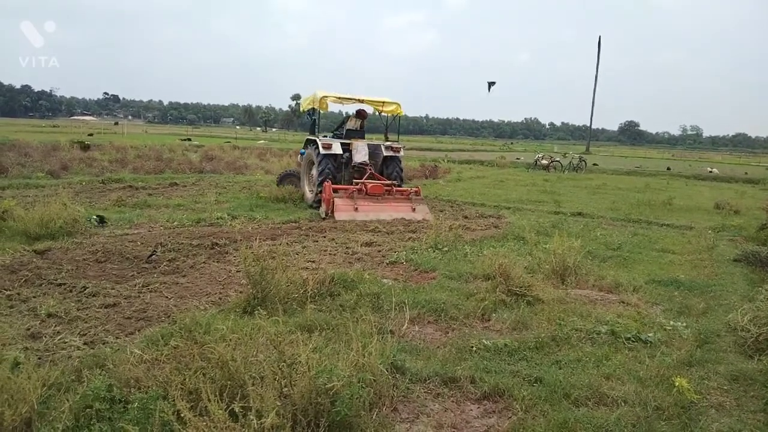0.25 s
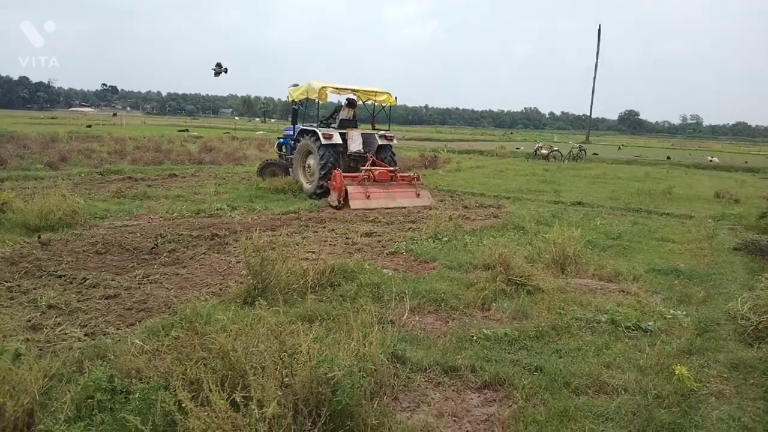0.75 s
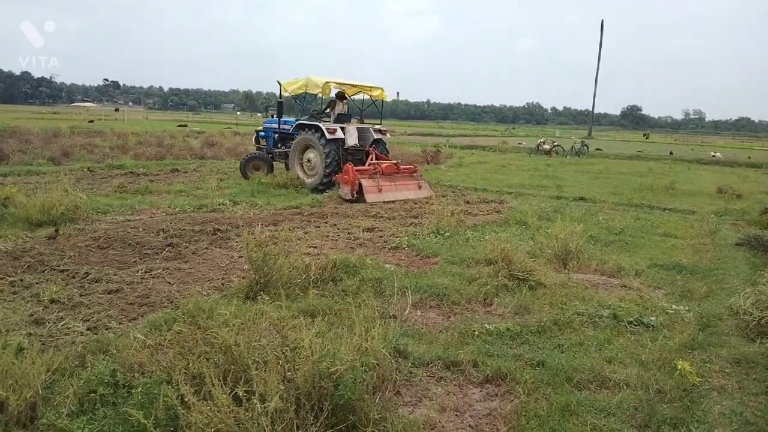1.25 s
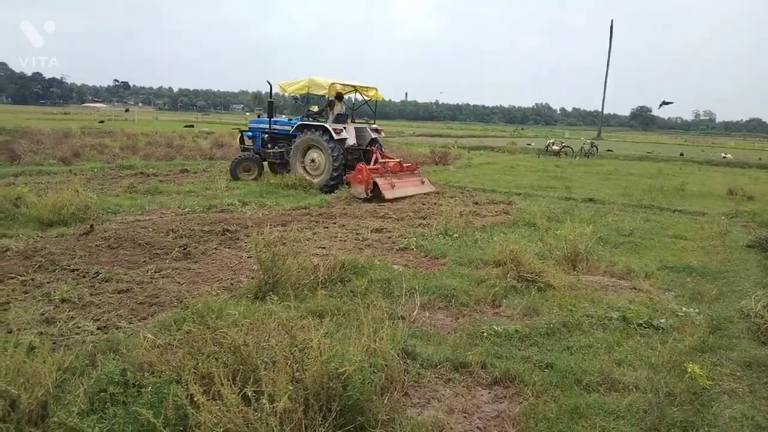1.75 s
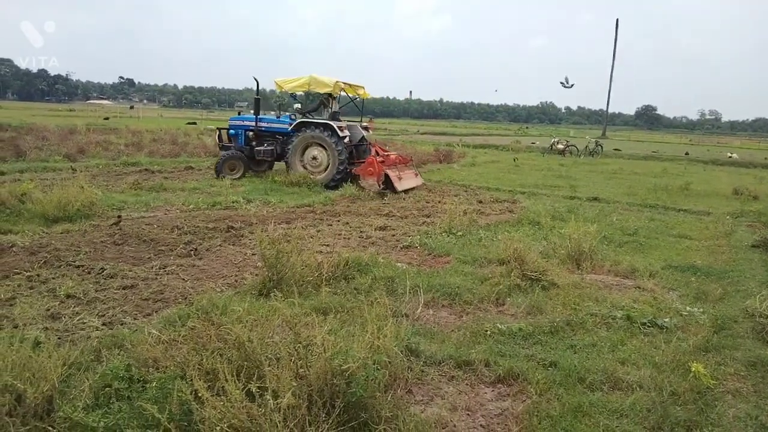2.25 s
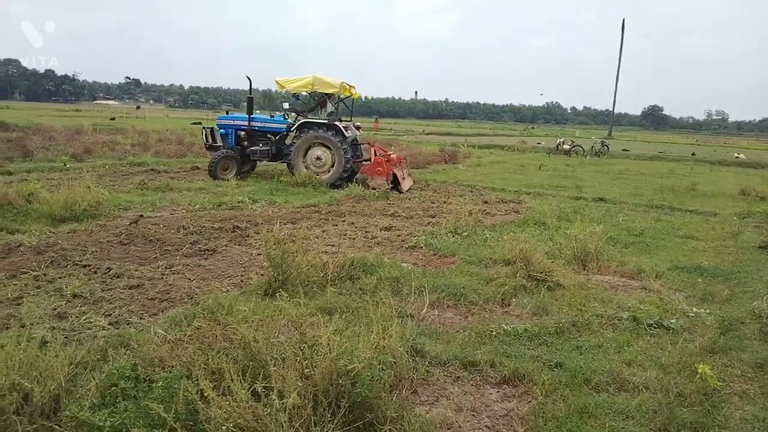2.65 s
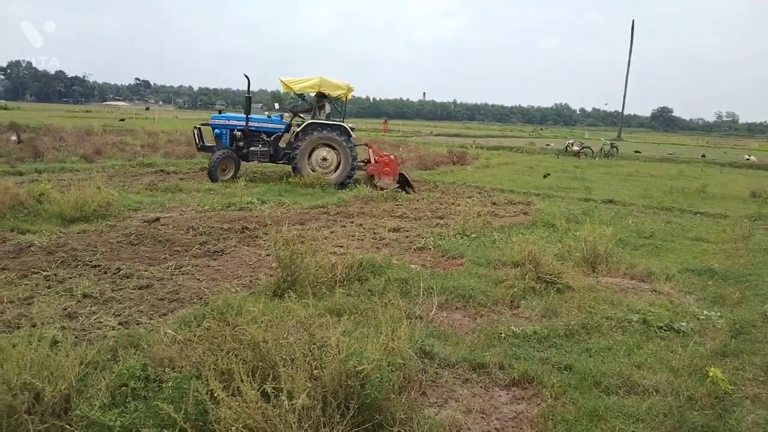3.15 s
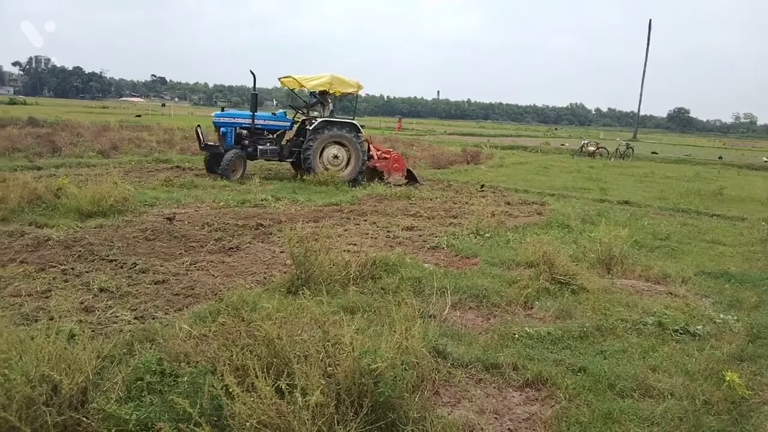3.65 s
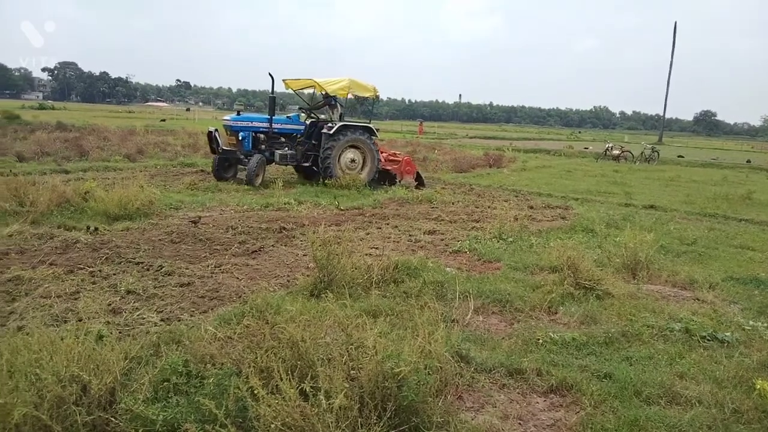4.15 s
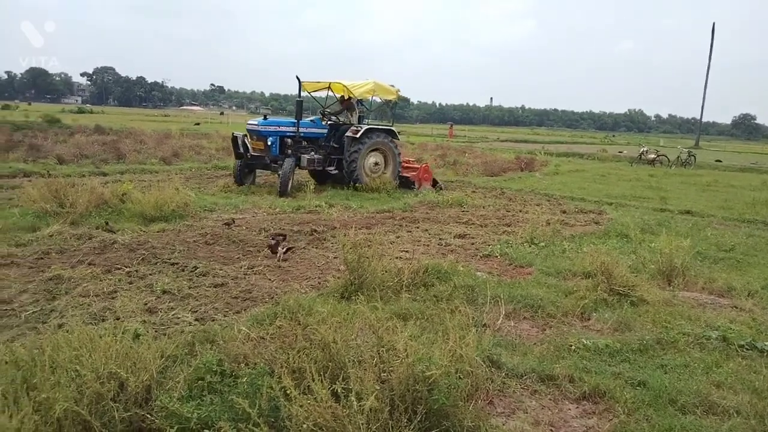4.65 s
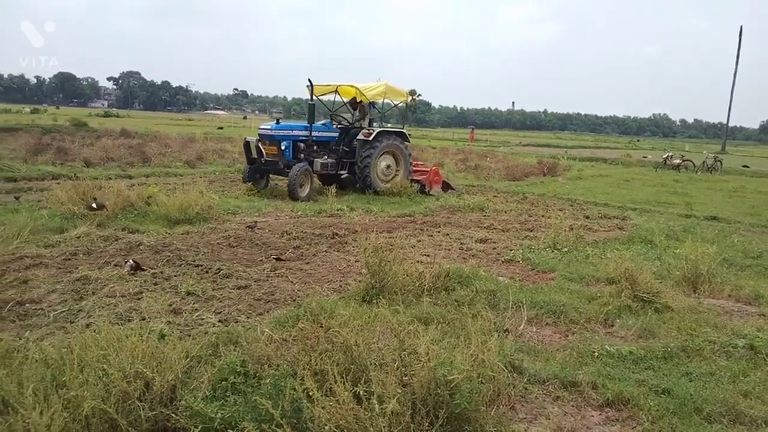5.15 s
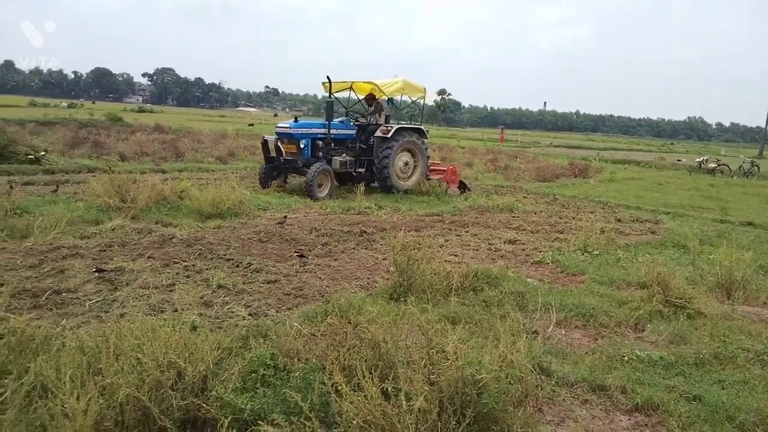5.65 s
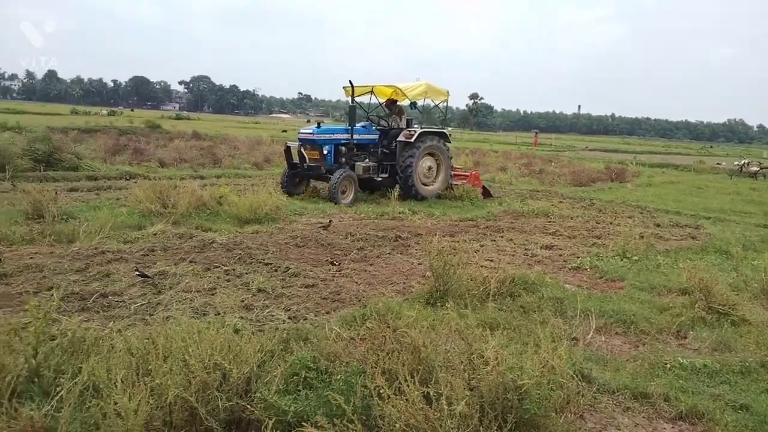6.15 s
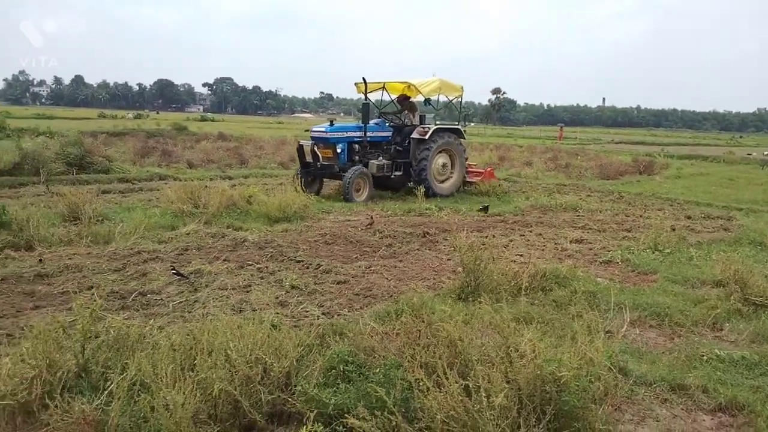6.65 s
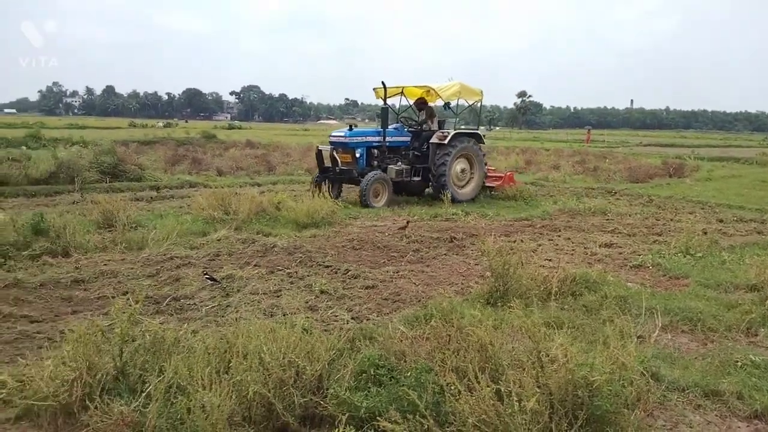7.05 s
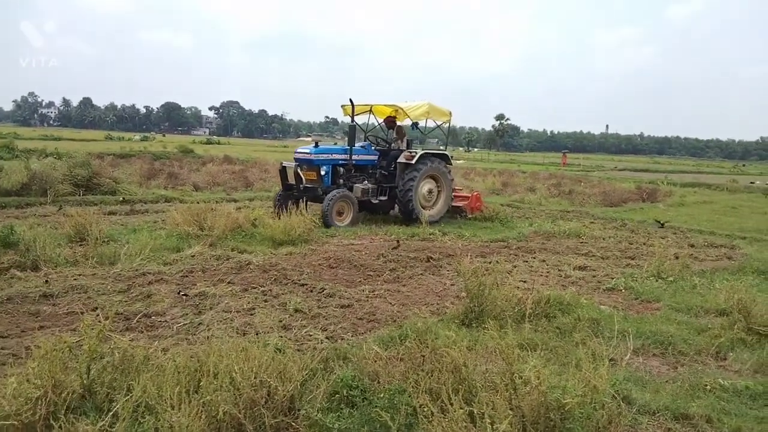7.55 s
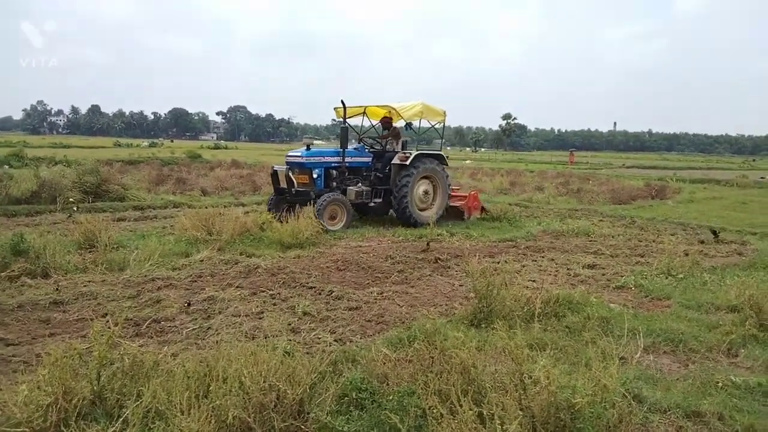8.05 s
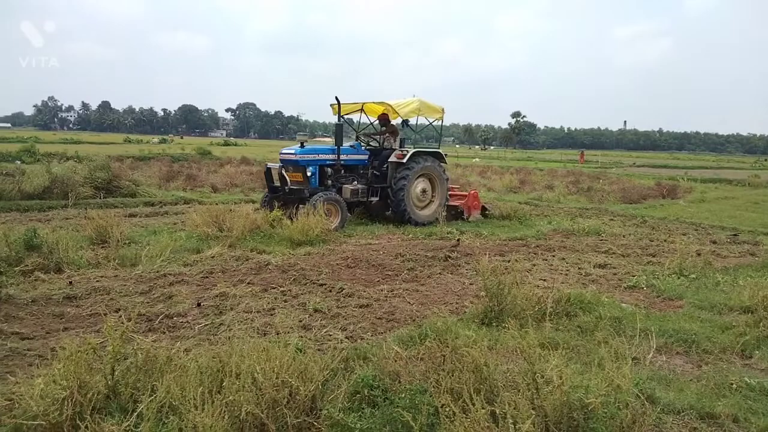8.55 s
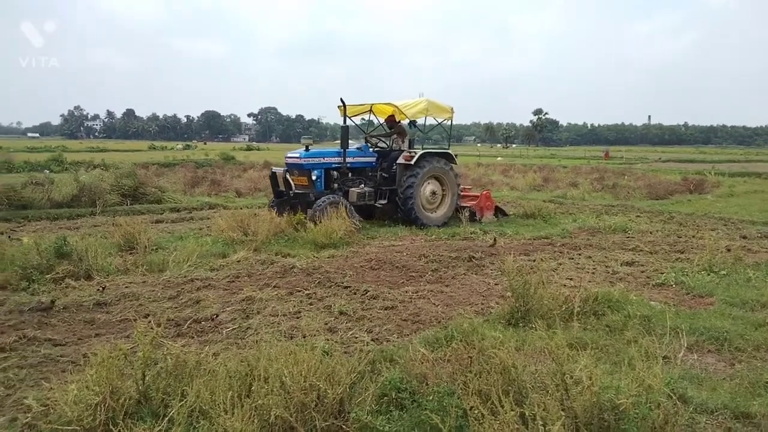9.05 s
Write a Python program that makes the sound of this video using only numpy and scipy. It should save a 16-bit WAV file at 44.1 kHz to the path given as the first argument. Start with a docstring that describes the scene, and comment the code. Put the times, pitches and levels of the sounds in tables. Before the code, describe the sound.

A diesel tractor works at a distance in an open field at steady fast revs. At first its clatter is faint, broken into thin watery streaks by a phone's noise reduction. It gradually strengthens, birds chirp and trill over it around the middle, then the machine comes round and its knocking, bright ticking and hollow exhaust boom become full and regular until the end.

```python
"""Diesel tractor turning at the far end of a field

A three-cylinder tractor swings round to face a distant phone microphone, over field rumble and hiss.
Blows in each engine cycle knock the pipe, block and covers: shaped noise, with a balance that shifts in the turn.
The recorder's noise suppressor breaks the sound into thin streaks, deep at first and shallow later,
and lets short dull blips through. Birds chirp in near-sine notes that slide or trill."""
import sys
import numpy as np
from scipy import signal
from scipy.fft import rfft, irfft
from scipy.io import wavfile
from scipy.ndimage import uniform_filter1d

SR = 44100
rng = np.random.default_rng(int(sys.argv[2]) if len(sys.argv) > 2 else 0)


def to_wav(sig):
    """Store sig (one row per channel, or 1-D mono) as 16-bit WAV at the path in sys.argv[1].

    Samples outside -1..1 are clipped; the rate is SR.
    """
    pcm = np.clip(np.atleast_2d(sig), -1, 1) * 32767
    pcm = np.round(pcm).astype(np.int16)
    wavfile.write(sys.argv[1], SR, pcm.T)  # frames by channels


N = 410130

# The tractor's turn and the noise suppressor's strength. Each row: time in seconds,
# turn (0 = away, 1 = facing), streak depth in dB (before the share of each range),
# strength of the held bands (a factor, 0-2).
TURN = [(0, 0, 12, 1.8), (1, 0, 12, 1.6), (2, 0, 11, 1.1), (3.3, .1, 10, .9), (4.2, .2, 9, .7),
        (4.9, .4, 9, .7), (5.4, 1, 3, .3), (6.2, 1, 2.5, .2), (9.3, 1, 2.5, .25)]


def gain_of(db):
    """Amplitude factor of a level in dB."""
    return 10 ** (np.asarray(db) / 20)


def evened(x):
    """Brings x to an rms of 1."""
    return x / np.sqrt(np.mean(x ** 2) + 1e-20)


def read(points, hz):
    """Reads a spectrum table at the frequencies hz, straight over log frequency."""
    f, value = np.transpose(points)
    return np.interp(np.log(hz + 1), np.log(f + 1), value)


def along(rows, column=1):
    """One column of a time table, at every sample."""
    rows = np.array(rows)
    return np.interp(np.arange(N) / SR, rows[:, 0], rows[:, column])


def smoothed_twice(x, size, axis=-1):
    """Two running means in a row, for a rounder wander."""
    return uniform_filter1d(uniform_filter1d(x, size, axis=axis), size, axis=axis)


def drift(hold_s):
    """Slow chance of rms 1 that holds its value for about hold_s."""
    step = 64
    steps = rng.standard_normal(N // step + 1)
    size = max(round(hold_s * SR / step), 1)
    return np.repeat(evened(smoothed_twice(steps, size)), step)[:N]


def coloured(x, colour):
    """Shapes x by a spectrum and the rings of the castings; causal, so that blows ring on afterwards."""
    # Narrow rings of the castings. Each row: centre in Hz, width in Hz, lift in dB.
    rings = [(393, 59, 3.5), (469.2, 19.5, 9.5), (1075, 7.4, 12.5), (1140, 43, 9), (1222, 26, 3),
             (1327.4, 13.4, 6), (2488, 17, 8)]
    size = 2 ** 14
    hz = np.fft.rfftfreq(size, 1 / SR)
    rings_db = sum(db / (1 + (2 * (hz - f) / width) ** 2) for f, width, db in rings)
    spectrum_db = np.maximum(read(colour, hz) + rings_db, -100)
    # folding the cepstrum onto its first half gives minimum phase: no sound ahead of the blow
    cepstrum = irfft(np.log(gain_of(spectrum_db)))
    cepstrum[1:size // 2] *= 2
    cepstrum[size // 2 + 1:] = 0
    ring = irfft(np.exp(rfft(cepstrum)))[:size // 2]
    return evened(signal.oaconvolve(x, ring)[:N])


def field():
    """Steady field rumble and microphone hiss: noise, shaped like every part with the rings added."""
    # Rumble and hiss. Each row: frequency in Hz, relative level in dB per Hz.
    bed = [(20, -17), (45, -25), (68, -11.5), (90, -2.5), (200, -6), (300, -12), (600, -19.5), (1000, -11),
           (1500, -23), (3000, -31), (5000, -35.5), (7600, -45), (8800, -56), (10800, -58), (11800, -43),
           (15900, -40)]
    return gain_of(-60) * coloured(rng.standard_normal(N), bed)


def birds():
    """Near-sine notes that slide, flattening at the end, or trill; the ground adds a short blur."""
    # Bird notes. Each row: start in seconds, length in seconds, start in Hz, end in Hz,
    # level in dB (before swell and flutter), trill range in Hz.
    chirps = [(1.352, 0.035, 4080, 3840, -46, 60), (1.392, 0.013, 3630, 4000, -53, 0),
              (1.51, 0.046, 2440, 2600, -50, 0), (1.772, 0.059, 5600, 3410, -49, 3),
              (1.833, 0.058, 3510, 3340, -51, 155), (2.358, 0.072, 5580, 3250, -39.5, 2),
              (2.424, 0.059, 3570, 3360, -43.5, 200), (3.314, 0.086, 5250, 3240, -42.5, 0),
              (3.552, 0.12, 3570, 3370, -44, 154), (3.685, 0.061, 3150, 3320, -40, 480),
              (3.74, 0.051, 2610, 1920, -43, 0), (3.824, 0.091, 5300, 3350, -45, 0),
              (3.965, 0.048, 3070, 3090, -43, 0), (3.987, 0.097, 3435, 3390, -40.5, 150),
              (4.104, 0.064, 3200, 3290, -38.5, 500), (4.163, 0.057, 2400, 1850, -45, 60),
              (4.249, 0.09, 5300, 3200, -44, 0), (4.37, 0.056, 3020, 2950, -46.5, 0),
              (4.424, 0.094, 2650, 2400, -42, 120), (4.492, 0.045, 2780, 1820, -46, 0),
              (4.7, 0.054, 5040, 3380, -46, 4), (4.755, 0.074, 3170, 3210, -41, 450),
              (4.814, 0.066, 2370, 1870, -45, 110), (4.953, 0.028, 1930, 1825, -42.5, 0),
              (5.086, 0.1, 2450, 2230, -41, 350), (5.385, 0.049, 2880, 2950, -46, 0),
              (5.455, 0.092, 2460, 2270, -43, 200), (5.725, 0.035, 4400, 3300, -43, 0),
              (5.787, 0.062, 3080, 3100, -44, 300)]
    trill_rate_hz, flutter_db = 58, 3.5
    out = np.zeros(N)
    for s, length_s, start_hz, end_hz, db, trill_hz in chirps:
        t = np.arange(0, length_s, 1 / SR)
        slide = np.sin(1.3 * t / length_s) / np.sin(1.3)
        trill = signal.sawtooth(2 * np.pi * trill_rate_hz * t, .3)  # quick rise, slower fall
        hz = start_hz + (end_hz - start_hz) * slide + trill_hz / 2 * trill
        waver = evened(smoothed_twice(rng.standard_normal(len(t)), 250))
        flutter = gain_of(flutter_db * waver)  # the noise suppressor makes the level flutter
        swell = signal.windows.tukey(len(t), .25) * (0.55 + 0.5 * t / length_s) * flutter
        note = np.sin(2 * np.pi * np.cumsum(hz) / SR)
        at = round(s * SR)
        out[at:at + len(t)] += gain_of(db) * np.sqrt(2) * swell * note
    fade_db = -38 - 60 * np.arange(2000) / SR / .08  # falls at 60 dB in 0.08 s
    blur = rng.standard_normal(2000) * gain_of(fade_db)
    return out + signal.oaconvolve(out, blur)[:N]


def suppressor_blips():
    """Short dull blips that the noise suppressor lets through: sines of some twenty thousandths of a second."""
    # Blips. Each row: start in seconds, approximate peak in dB, pitch in Hz.
    blips = [(.045, -52.5, 610), (.115, -52, 620), (.185, -53, 620), (1.012, -55, 670), (1.812, -55, 674),
             (2.205, -56, 537), (4.275, -47, 560), (4.545, -54, 543), (4.61, -55, 560), (4.765, -49, 547),
             (4.9, -54, 580), (5.1, -51, 572), (6.014, -46, 880), (6.185, -47, 875), (6.329, -36, 954),
             (6.409, -47, 850), (6.479, -41, 864), (6.617, -44, 880), (6.886, -40, 920), (7.107, -36, 936),
             (7.165, -41.5, 840), (7.458, -43, 900), (8.09, -39, 935), (8.426, -43, 860)]
    out, t = np.zeros(N), np.arange(2000) / SR
    for s, db, hz in blips:
        at = round(s * SR)
        swell = t / 0.0053 * np.exp(1 - t / 0.0057)
        out[at:at + len(t)] += gain_of(db) * swell * np.sin(2 * np.pi * hz * t)
    return out


def engine_cycles():
    """Engine cycles run so far, at every sample; a four-stroke cycle is two turns of the crank."""
    # Crank speed. Each row: time in seconds, speed in revolutions a minute.
    crank_speed = [(0.0, 1701.5), (0.5, 1705.2), (1.0, 1727.7), (1.5, 1730.2), (2.0, 1737.5), (2.5, 1738.5),
                   (3.0, 1741.5), (3.5, 1727.7), (4.0, 1735.9), (4.5, 1769.3), (5.0, 1731.4), (5.5, 1715.2),
                   (6.0, 1722.7), (6.5, 1718.4), (7.0, 1714.3), (7.5, 1703.6), (8.0, 1720.0), (8.5, 1716.8),
                   (9.0, 1721.8), (9.3, 1723.2)]
    cycle_at_start = .075
    return cycle_at_start + np.cumsum(along(crank_speed)) / 120 / SR


def exhaust_tones(cycle):
    """Low exhaust tones locked to the engine cycle; they grow as the tractor comes round."""
    # Exhaust tones. Each row: multiple of the engine cycle, level in dB before the growth.
    orders = [(3, -72.5), (6, -50), (9, -62), (10, -71), (12, -63.5), (13, -65)]
    nearing = gain_of(0.5 * (np.arange(N) / SR - 17.0))  # half a dB a second
    tones = sum(gain_of(db) * np.sqrt(2) * np.cos(2 * np.pi * k * cycle) for k, db in orders)
    return nearing * tones


def recurring(cycle, alike):
    """Noise whose share alike (of power) comes back almost unchanged in the next engine cycle."""
    carry_away, carry_facing = .86, .97  # part of the rattle carried over to the next cycle
    count = cycle.astype(int)
    since = np.arange(N) - np.searchsorted(count, count)  # samples since the cycle began
    held = rng.standard_normal((count[-1] + 1, since.max() + 1))
    turn = along(TURN)[np.searchsorted(count, np.arange(len(held)))]
    carry = carry_away + turn * (carry_facing - carry_away)
    for k in range(1, len(held)):
        held[k] = carry[k] * held[k - 1] + np.sqrt(1 - carry[k] ** 2) * held[k]
    alike = np.clip(alike, 0, 1)
    return np.sqrt(alike) * held[count, since] + np.sqrt(1 - alike) * rng.standard_normal(N)


def knocked(cycle, blows, colour, scatter_db, rise_s, knock_db, alike):
    """Each blow is a sharp knock, recurring so that engine orders show, and a flare of rattle."""
    # the blows slide slowly about: shares of the cycle, and for how many cycles a place holds
    slide_away, slide_facing, slide_cycles = .012, .003, 9
    strength_db = scatter_db * rng.standard_normal((int(cycle[-1]) + 2, len(blows)))
    cycle_s, step = N / SR / (cycle[-1] - cycle[0]), 8
    coarse, turn = cycle[::step], np.clip(along(TURN)[::step], 0, 1)
    wander = evened(smoothed_twice(rng.standard_normal(strength_db.shape), slide_cycles, axis=0))
    slide = slide_away + turn * (slide_facing - slide_away)
    flare, knocks = np.ones(len(coarse)), np.zeros(N)
    for k, (share, away_db, facing_db, decay_s) in enumerate(blows):
        slid = coarse + slide * np.interp(coarse, np.arange(len(wander)), wander[:, k])
        since = slid - share + 1
        age_s = since % 1 * cycle_s
        force = gain_of(away_db + turn * (facing_db - away_db) + strength_db[since.astype(int), k])
        flare = flare + force * np.exp(-age_s / decay_s) * (1 - np.exp(-age_s / rise_s))
        due = np.arange(1, int(cycle[-1]) - 1) + share
        at = np.interp(due, slid, np.arange(len(slid)) * step).astype(int)
        knocks[at] += force[at // step + 1]  # read just after the blow, where its force is the new one
    rattle = np.repeat(flare, step)[:N] * recurring(cycle, alike)
    return coloured(rattle + gain_of(knock_db) * knocks, colour)


def block(cycle):
    """The engine block, knocked several times a cycle, heard around 1 kHz."""
    # Colour of the block. Each row: frequency in Hz, relative level in dB per Hz.
    block_colour = [(460, -64.5), (780, -55), (870, -25.5), (1040, -1.5), (1110, -1.5), (1240, -1),
                    (1610, -38.5), (2730, -120)]
    # Blows. Each row: share of the cycle, dB over the steady rattle turned away, dB facing, decay in s.
    block_blows = [(.1, 2, 2, .003), (.17, 2, 1, .003), (.447, 13, 14.5, .003), (.57, 6, 8, .003),
                   (.652, 0, 11, .003), (.76, 11, 6, .003), (.855, 3, 9, .003), (.96, -2, 0, .002)]
    return knocked(cycle, block_blows, block_colour, scatter_db=1.4, rise_s=.001, knock_db=23.5, alike=.6)


def gearbox(cycle):
    """The gearbox, whose blows change places in strength as the tractor turns."""
    # Colour of the gearbox. Each row: frequency in Hz, relative level in dB per Hz.
    gearbox_colour = [(710, -55.5), (1200, 6), (1390, 3), (1440, -7), (1480, -62.5), (1520, -49),
                      (1980, -59.5), (3340, -120)]
    # Blows. Each row: share of the cycle, dB over the steady rattle turned away, dB facing, decay in s.
    gearbox_blows = [(.145, 4, 8, .003), (.245, 4, 7, .002), (.432, -5, 12.5, .003), (.46, 14, -5, .004),
                     (.53, 10, 9, .003), (.615, 0, 10, .002), (.79, 13, -3, .004), (.855, 3, 7, .002),
                     (.945, -5, 7, .002)]
    return knocked(cycle, gearbox_blows, gearbox_colour, scatter_db=1.4, rise_s=.001, knock_db=24, alike=.6)


def bonnet(cycle):
    """The bonnet, rattling mostly between 1.6 and 3.7 kHz."""
    # Colour of the bonnet. Each row: frequency in Hz, relative level in dB per Hz.
    bonnet_colour = [(890, -65), (1520, -14.5), (1660, 11.5), (1740, 6.5), (1850, 1.5), (1950, 7.5),
                     (2060, 7.5), (2240, 8.5), (2410, 12.5), (2510, 11), (2850, 0), (3700, -3),
                     (6270, -120)]
    # Blows. Each row: share of the cycle, dB over the steady rattle turned away, dB facing, decay in s.
    bonnet_blows = [(.125, 11, 9, .004), (.19, 7, 11, .004), (.235, 6, 7, .005), (.462, 9, 9.5, .004),
                    (.51, 6, 6, .005), (.57, 4, 4, .005), (.79, 9, 5, .004), (.83, 7, 8, .004),
                    (.875, 4, 6, .005)]
    return knocked(cycle, bonnet_blows, bonnet_colour, scatter_db=2.5, rise_s=.0007, knock_db=21, alike=.35)


def valve_cover(cycle):
    """The valve cover, knocked by the three firings of each cycle."""
    # Colour of the cover. Each row: frequency in Hz, relative level in dB per Hz.
    cover_colour = [(1650, -49), (2800, -3.5), (3040, -5), (3350, -2.5), (3680, -2), (3900, 3),
                    (4280, -1.5), (4500, -0.5), (4700, 1.5), (4820, 1), (5080, -1.5), (5650, -4),
                    (7340, -27.5), (12400, -120)]
    # Blows. Each row: share of the cycle, dB over the steady rattle turned away, dB facing, decay in s.
    firing_blows = [(.04, 2, 7.5, .006), (.372, 4.5, 7, .008), (.705, 4, 11.5, .004)]
    return knocked(cycle, firing_blows, cover_colour, scatter_db=3.2, rise_s=.0009, knock_db=11, alike=.25)


def injector_ticks(cycle):
    """Bright injector ticks, three to a cycle."""
    # Colour of the ticks. Each row: frequency in Hz, relative level in dB per Hz.
    tick_colour = [(3290, -36), (5600, -14), (5850, 4.5), (6260, 7.5), (6520, 8), (7250, 3.5), (8210, 1),
                   (9210, 0.5), (10400, -3.5), (12300, -20), (13500, -25)]
    # Blows. Each row: share of the cycle, dB over the steady rattle turned away, dB facing, decay in s.
    tick_blows = [(.065, 3, 11.5, .007), (.392, 3, 10.5, .008), (.72, 5, 16, .005)]
    return knocked(cycle, tick_blows, tick_colour, scatter_db=3.2, rise_s=.00064, knock_db=9, alike=.2)


def tick_edge(cycle):
    """The highest edge of the ticks, which carries at a steady level setting."""
    # Colour of the edge. Each row: frequency in Hz, relative level in dB per Hz.
    edge_colour = [(9000, -61), (11000, -4), (11800, 10), (13500, -11), (15900, -25)]
    # Blows. Each row: share of the cycle, dB over the steady rattle turned away, dB facing, decay in s.
    edge_blows = [(.065, 12, 12, .004), (.405, 16, 12, 0.0033), (.73, 6.5, 9.2, 0.0031)]
    edge = knocked(cycle, edge_blows, edge_colour, scatter_db=3.0, rise_s=.0006, knock_db=7, alike=0)
    return gain_of(-86) * edge


def clatter(cycle):
    """Five knocked parts, each wavering in level by itself, more when turned away."""
    # Low clatter before the waver. Each row: time in seconds, block level in dB, gearbox level in dB.
    low_levels = [(0.0, -60, -65), (0.18, -74, -71), (0.23, -50.5, -81), (0.39, -38, -70),
                  (0.47, -40.5, -74), (0.49, -49.5, -51), (0.72, -54, -69), (0.8, -64, -73),
                  (0.93, -49, -54), (1.09, -74, -47.5), (1.16, -37.5, -43), (1.22, -53.5, -47.5),
                  (2.05, -43.5, -36), (2.3, -34.5, -35), (2.43, -41, -39), (2.77, -35.5, -29.5),
                  (3.34, -38, -38), (3.47, -34, -35.5), (4.22, -42, -36), (4.74, -40.5, -42.5),
                  (5.46, -37.5, -39.5), (7.05, -38.5, -39), (8.03, -38.5, -36), (9.3, -39.5, -38)]
    # High clatter before the waver. Each row: time in seconds, bonnet level in dB,
    # valve cover level in dB, injector tick level in dB.
    high_levels = [(0.0, -50, -54, -69), (0.1, -55.5, -62, -95), (0.28, -63, -56, -88),
                   (0.33, -49, -47, -67), (0.65, -54.5, -58.5, -83), (0.7, -53, -57, -67),
                   (0.86, -52, -51.5, -67), (1.0, -56, -56.5, -77), (1.27, -46.5, -53, -65),
                   (1.5, -50, -51.5, -68), (2.38, -43.5, -46, -59.5), (2.69, -45.5, -52.5, -64.5),
                   (4.14, -44.5, -46, -58), (4.35, -46, -46.5, -57), (4.5, -42.5, -52, -66),
                   (4.58, -47, -51, -65.5), (5.46, -42, -44, -54), (6.06, -43.5, -45, -55),
                   (7.35, -41, -43, -49), (9.17, -41.5, -43.5, -56), (9.3, -37, -42, -52)]
    waver_away_db, waver_facing_db, waver_s = 1.2, 0.3, 0.087
    parts = [block(cycle), gearbox(cycle), bonnet(cycle), valve_cover(cycle), injector_ticks(cycle)]
    levels_db = [along(low_levels, column=k) for k in (1, 2)]
    levels_db += [along(high_levels, column=k) for k in (1, 2, 3)]
    waver_db = waver_away_db + (waver_facing_db - waver_away_db) * along(TURN)
    return sum(gain_of(db + waver_db * drift(waver_s)) * part for db, part in zip(levels_db, parts))


def pipe_gain():
    """The noise suppressor lets the boom through in short bursts, then stays open; both waver."""
    # Short openings. Each row: start in seconds, length in seconds, level in dB before the waver.
    openings = [(0.695, 0.122, -51), (0.9, 0.029, -52), (0.97, 0.067, -41), (1.189, 0.03, -45),
                (3.026, 0.11, -52), (3.21, 0.03, -49), (3.252, 0.19, -43), (3.46, 0.24, -45.5),
                (4.22, 0.02, -57), (4.27, 0.031, -52), (4.53, 0.054, -61)]
    # Open for good, from the first row on. Each row: time in seconds, level in dB before the waver.
    open_boom = [(5.24, -52), (5.27, -45.5), (5.9, -45.5), (6.26, -49.5), (6.32, -43), (7.2, -44),
                 (7.35, -40.5), (8.0, -44), (9.3, -39.5)]
    edge_s, hidden_db, waver_db, waver_s = 0.005, -68, 2.0, 0.07
    t = np.arange(N) / SR
    gain = gain_of(hidden_db) + (t > open_boom[0][0]) * gain_of(along(open_boom))
    for s, length_s, db in openings:
        inside_s = np.minimum(t - s, s + length_s - t)
        gain = gain + gain_of(db) * np.clip(inside_s / edge_s + .5, 0, 1)
    return gain * gain_of(waver_db * drift(waver_s))


def pipe(cycle):
    """The exhaust pipe, booming around 500 Hz at each blow."""
    # Colour of the pipe. Each row: frequency in Hz, relative level in dB per Hz.
    pipe_colour = [(190, -81), (330, -24.5), (350, -30), (399, -11), (477, 0.5), (540, 1), (610, -11.5),
                   (720, -38), (940, -81), (1580, -120)]
    # Blows. Each row: share of the cycle, dB over the steady rattle turned away, dB facing, decay in s.
    pipe_blows = [(.9, 9, 13, .006), (.02, 8, 11, .006), (.12, 7, 7, .005), (.3, 7, 2, .008),
                  (.675, 6, 10, .004), (.76, 7, 8, .003)]
    boom = knocked(cycle, pipe_blows, pipe_colour, scatter_db=1.5, rise_s=.002, knock_db=27.0, alike=.7)
    return pipe_gain() * boom


def tractor():
    """The clatter, the edge of the ticks and the pipe, over the low exhaust tones."""
    cycle = engine_cycles()
    return clatter(cycle) + tick_edge(cycle) + pipe(cycle) + exhaust_tones(cycle)


def suppressed(x, hold_s, width_hz):
    """The noise suppressor lets thin bands through at random and holds others down, most strongly early on."""
    # Bands the suppressor holds down or favours. Each row: centre in Hz, width in Hz,
    # level in dB before the strength factor.
    held_bands = [(995, 52, 12.5), (1176, 180, -6), (1385, 51, 7), (1600, 95, -11), (1727, 62, 2),
                  (1677, 68, -14), (2458, 180, -6), (2818, 194, -13.5), (3160, 770, 3), (3736, 690, -8.5),
                  (4202, 120, -3), (4680, 420, -16), (5150, 630, 9.5), (5540, 710, -6.5),
                  (6400, 180, -15.5), (6660, 110, -34)]
    # How strongly each range streaks. Each row: frequency in Hz, share of the streak depth.
    streaky = [(250, 0), (400, .7), (1000, .2), (1500, .1), (2000, .6), (3000, .8), (7000, 1.6),
               (10500, 1.6), (11600, 0), (16000, 0)]
    # Bands it holds down (or, with a plus, favours) for a while. Each row: start in seconds,
    # end in seconds, centre in Hz, width in Hz, level in dB.
    passing_bands = [(0, 1.4, 1853, 200, -16), (0, 1.35, 2600, 263, -23), (0, 1.6, 3720, 300, -19),
                     (0, 0.32, 5650, 1500, -14), (0, 5.2, 650, 240, -18), (0, 5.2, 350, 130, -10),
                     (2.0, 2.68, 1160, 130, -10), (.28, 1.2, 1195, 149, -13),
                     (0.488, 0.69, 5500, 2500, -14), (1.62, 2.1, 8900, 2600, -14),
                     (2.1, 3.7, 9800, 1490, -14.5), (3.7, 4.9, 10040, 1000, -13), (.5, 1.1, 1230, 400, 6),
                     (.55, 0.76, 9900, 3680, -12), (.92, 1.3, 8600, 3200, -15), (4.55, 5.4, 1650, 161, -27),
                     (6.0, 6.75, 5400, 160, -5), (6.05, 7.6, 3540, 150, -11), (6.05, 7.2, 1860, 110, -20),
                     (6.5, 7, 4460, 130, -9), (7.55, 9.5, 5600, 200, -13), (7.6, 8.698, 3770, 170, -20),
                     (8.4, 9.9, 1775, 110, -14)]
    band_edge_s = 0.042
    hz, t, z = signal.stft(x, SR, nperseg=1024, noverlap=768)
    chance = rng.standard_normal(z.shape[::-1]).T
    chance = uniform_filter1d(chance, max(round(hold_s / t[1]), 1), axis=1)
    chance = evened(uniform_filter1d(chance, max(round(width_hz / hz[1]), 1), axis=0))
    s, _, depth_db, strength = np.transpose(TURN)
    held_db = sum(db * np.exp(-(2 * (hz - f) / width) ** 2) for f, width, db in held_bands)
    streaks_db = np.interp(t, s, depth_db) * np.tanh(1.5 * chance) * read(streaky, hz)[:, None]
    lift = gain_of(streaks_db + held_db[:, None] * np.interp(t, s, strength))
    lift = lift / np.sqrt(uniform_filter1d(lift ** 2, 30, axis=0))  # wide bands keep their level
    passing_db = 0
    for start_s, end_s, f, width, db in passing_bands:
        band = np.exp(-(2 * (hz - f) / width) ** 4)
        active = np.clip(np.minimum(t - start_s, end_s - t) / band_edge_s + .5, 0, 1)
        passing_db = passing_db + db * np.outer(band, active)
    lift = lift * gain_of(passing_db)
    return signal.istft(z * lift, SR, nperseg=1024, noverlap=768)[1][:N]


def scene():
    """The suppressed tractor over the field, with the suppressor's blips and birds, in one channel."""
    suppressed_tractor = suppressed(tractor(), hold_s=0.309, width_hz=130)
    return (suppressed_tractor + field() + suppressor_blips() + birds())[None]


def record(dry):
    """The band limit of the recorder: a steep low-pass."""
    edge_hz = 15800
    low_pass = signal.firwin(511, edge_hz, window=("kaiser", 9), fs=SR)
    return signal.oaconvolve(dry, low_pass[None], "same")


dry = scene()
out = record(dry)
to_wav(out)
```